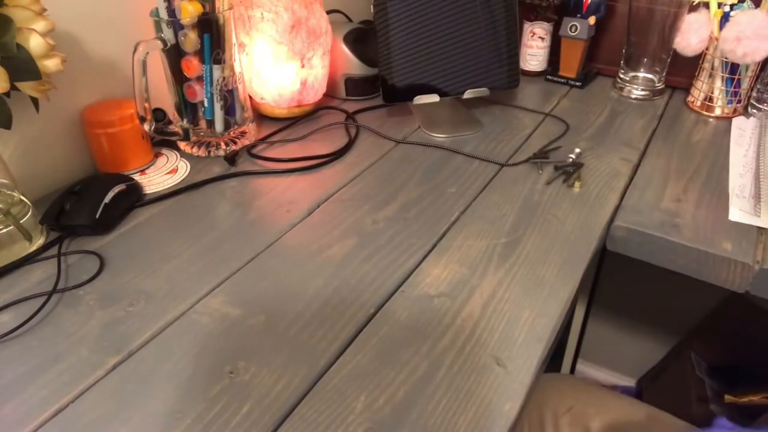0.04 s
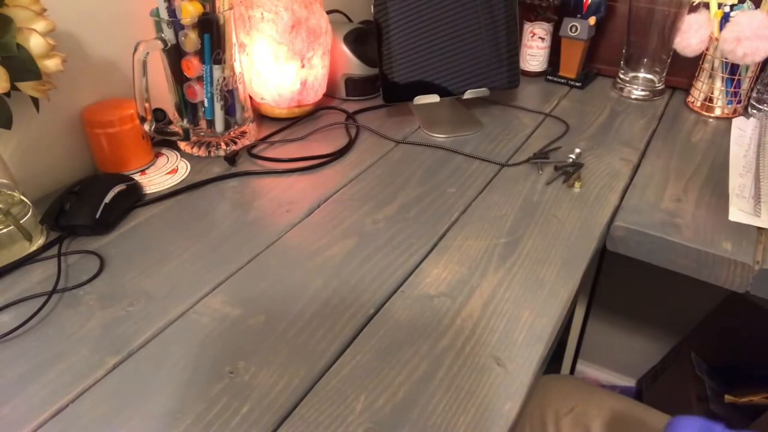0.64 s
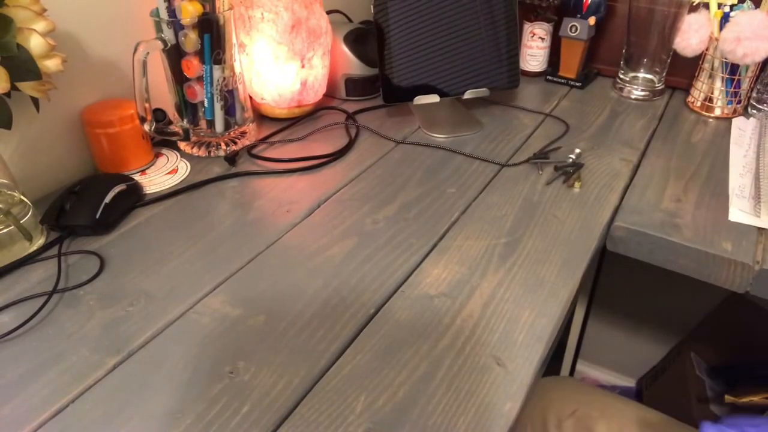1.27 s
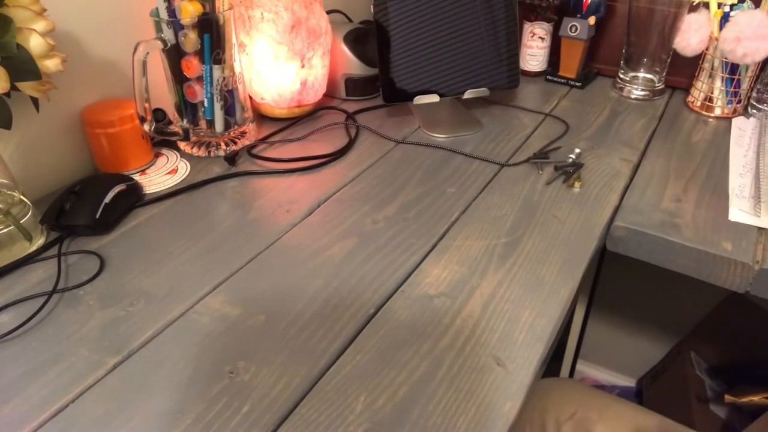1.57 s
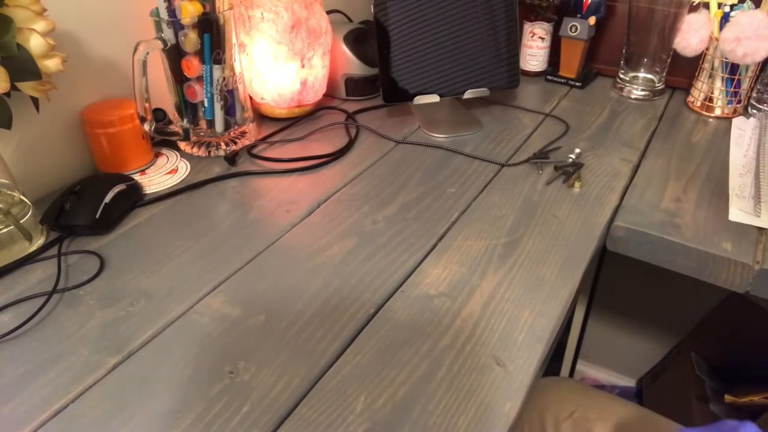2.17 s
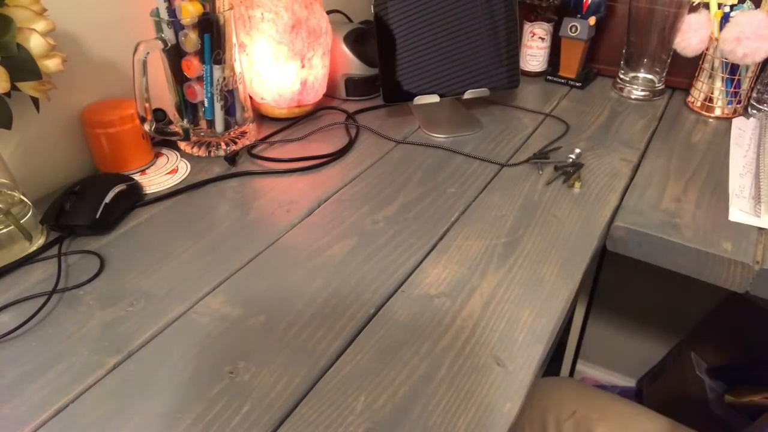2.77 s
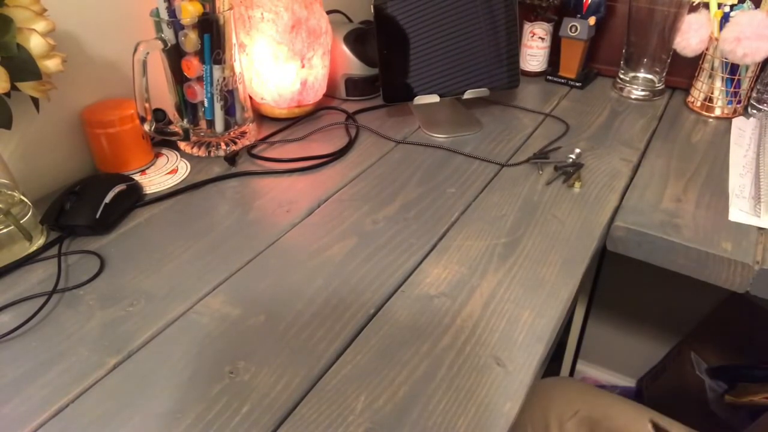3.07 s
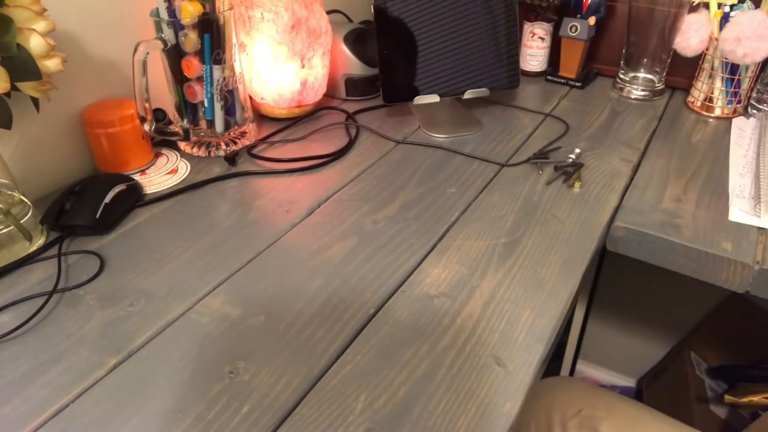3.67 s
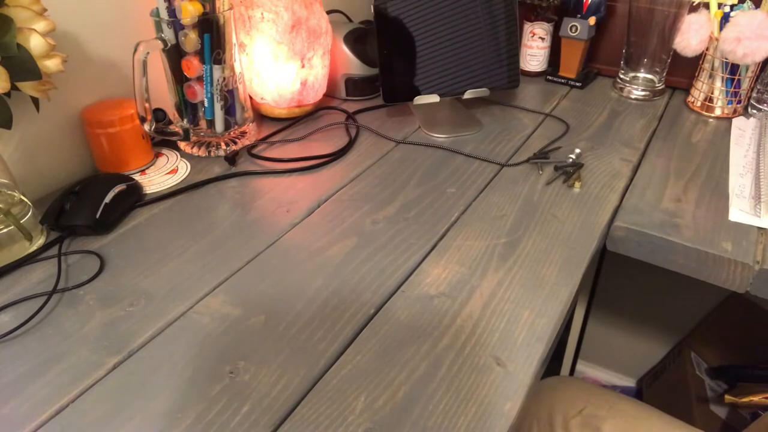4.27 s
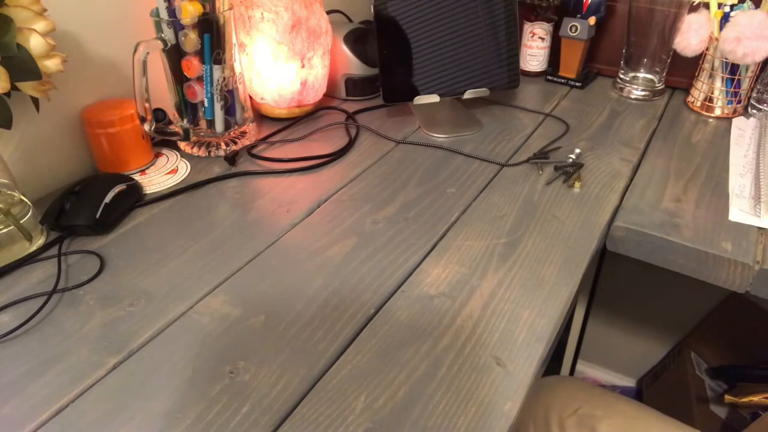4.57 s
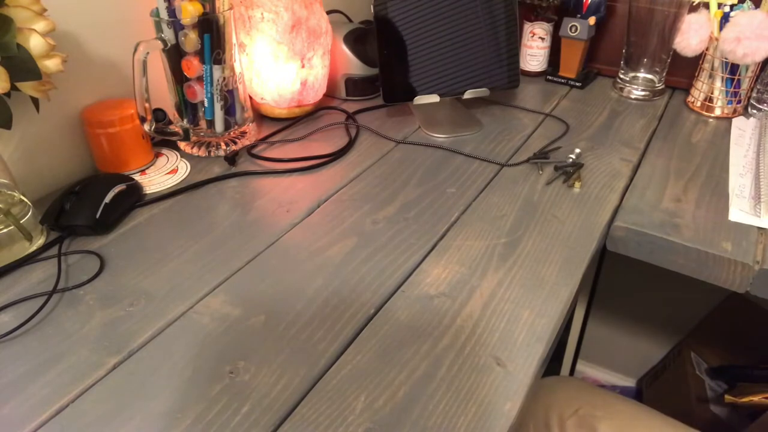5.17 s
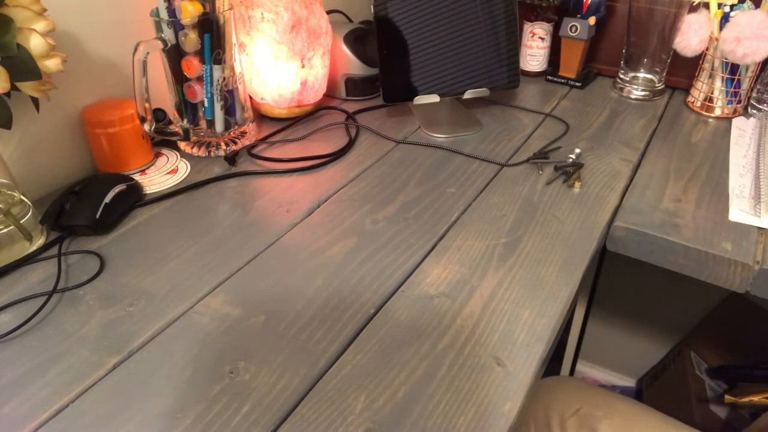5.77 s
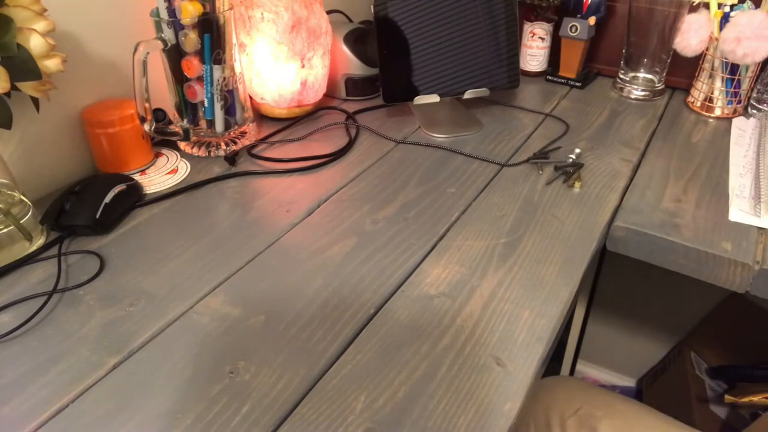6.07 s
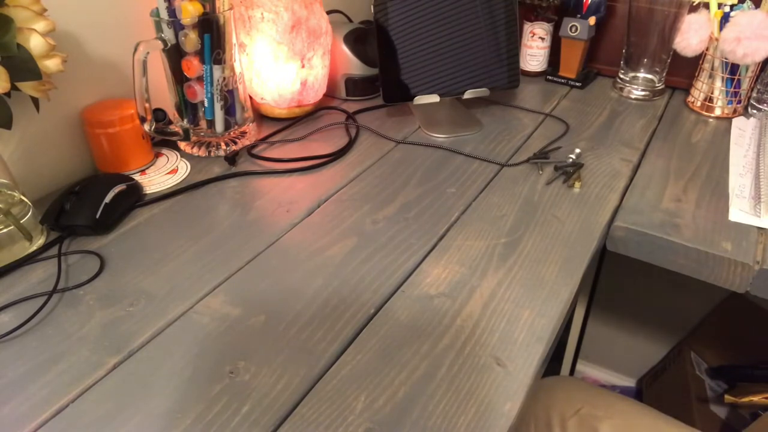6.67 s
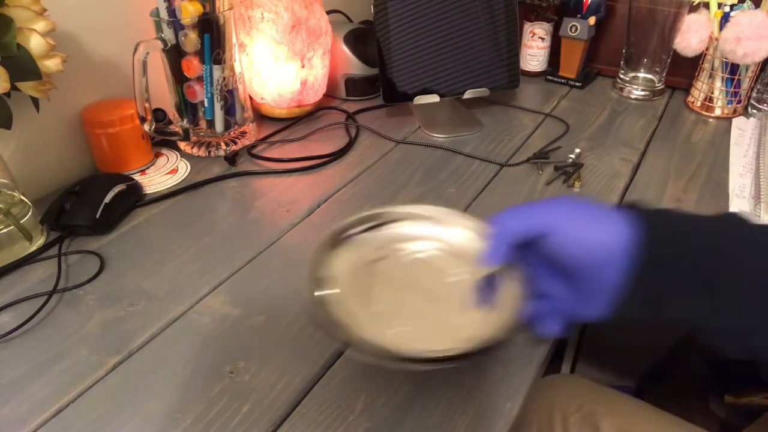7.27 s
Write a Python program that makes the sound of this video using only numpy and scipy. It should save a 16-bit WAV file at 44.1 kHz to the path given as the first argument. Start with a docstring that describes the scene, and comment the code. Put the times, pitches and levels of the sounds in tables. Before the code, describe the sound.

Hard plastic packaging creaks, rustles and pops as it is worked open by hand near the microphone. The handling builds to a run of sharp cracks and crackles, then eases into softer pops and ticks. A metal dish inside then slides out with a short scrape and a damped clank, the loudest moment. The room is small, with little echo, soft air noise and a low hum.

```python
"""Beside a desk in a small room, gloved hands pry open a stiff, clear plastic blister pack.
The shell buckles: small panels jump with sharp snaps, broad ones with hollow pops, and each pulse
spreads through the sheet as bending waves. Between them, stick-slip friction makes the plastic rub
and crinkle. The metal dish inside scrapes out of its hollow, knocks against the shell and rings
faintly as it comes free. Quiet room air and a low hum lie underneath."""
import sys
import numpy as np
from scipy import signal
from scipy.fft import rfft, irfft
from scipy.io import wavfile
from scipy.ndimage import map_coordinates

SR = 44100
rng = np.random.default_rng(int(sys.argv[2]) if len(sys.argv) > 2 else 0)


def master_out(mix):
    """Clip the mix to full scale and print it as 16-bit PCM to the path in sys.argv[1]."""
    frames = np.transpose(np.atleast_2d(mix))
    ceiling = np.clip(frames, -1, 1)
    pcm = np.round(ceiling * 32767).astype(np.int16)
    wavfile.write(sys.argv[1], SR, pcm)


N = 323253
TIME = np.arange(N) / SR
SIZE = 16384  # samples in an impulse response
HZ = np.maximum(np.fft.rfftfreq(SIZE, 1 / SR), 1)
AGE = np.arange(SIZE) / SR
FADE_OUT = np.clip((AGE[-1] - AGE) * 10, 0, 1)  # closes a response over its last 0.1 s
RING_Q = 5.25  # quality factor of the panels and of the dish's hand-damped rim


def undb(db):
    """Decibels to amplitude ratio."""
    return 10 ** (np.asarray(db) / 20)


def curve(points, hz):
    """Linear interpolation on a log-frequency axis."""
    f, value = np.transpose(points)
    return np.interp(np.log(hz), np.log(f), value)


def unit(x):
    """Normalisation to rms 1."""
    return x / np.sqrt(np.mean(x ** 2))


def add(out, start_s, x):
    """Superposition: x joins out from start_s on."""
    i = max(int(start_s * SR), 0)
    out[i:i + len(x)] += x[:N - i]


def through(x, response):
    """Convolution, cut to the length of x."""
    return signal.fftconvolve(x, response)[:len(x)]


def minimum_phase(gain):
    """Minimum phase gives the most compact causal pulse with this gain over HZ."""
    cepstrum = irfft(np.log(gain + 1e-6))
    cepstrum[1:SIZE // 2] *= 2
    cepstrum[SIZE // 2 + 1:] = 0
    return irfft(np.exp(rfft(cepstrum)))


def whiten(response, share=0.45):
    """Spectral whitening: unit power in broad bands, with the finer resonances kept."""
    cumulative = np.cumsum(np.abs(rfft(response)) ** 2)
    low = np.maximum(HZ * (1 - share) - 50, 1)
    high = np.minimum(HZ * (1 + share) + 50, SR / 2)
    in_band = np.interp(high, HZ, cumulative) - np.interp(low, HZ, cumulative)
    power = in_band / (high - low) * SR / SIZE
    return through(response, minimum_phase(1 / np.sqrt(power)))


def resonance(hz, width):
    """Gain of a damped resonator, 1 at its centre."""
    return 1 / np.sqrt(1 + (hz / width * (HZ / hz - hz / HZ)) ** 2)


def reflections(t60):
    """Dense reflections merge into exponentially decaying noise of unit energy."""
    return unit(rng.standard_normal(SIZE) * undb(-60 * AGE / t60)) / np.sqrt(SIZE)


def waver(hz):
    """Random modulation: low-passed noise of rms 1."""
    return unit(irfft(rfft(rng.standard_normal(SIZE)) / (1 + (HZ / hz) ** 2)))


def background(air_db=-65.5):
    """Noise floor: room air as steady coloured noise, with a low pure-tone hum."""
    # Each row: frequency in Hz, relative level in dB.
    air_spectrum = [(25, -15), (55, 9.5), (85, -1), (650, -6), (5000, -19.5), (10400, -25.5),
                    (15500, -27.5)]
    # Each row: frequency in Hz, rms level in dB.
    hum_tones = [(120, -73)]
    air = unit(through(rng.standard_normal(N), minimum_phase(undb(curve(air_spectrum, HZ)))))
    hum = sum(np.sqrt(2) * undb(db) * np.sin(2 * np.pi * hz * TIME) for hz, db in hum_tones)
    return undb(air_db) * air + hum


def room(wet_db, gap_s=0.0016, absorb_hz=9000, wall_s=0.01, wall_spread_s=0.0012, wall_db=-9):
    """Reverberation: direct sound, then a tail dulled by absorption, new for each position of the pack."""
    # Each row: frequency in Hz, time to decay by 60 dB in seconds.
    decay_times = [(500, 0.26), (12000, 0.32)]
    band_hz, band_t60 = np.transpose(decay_times)
    shares = [curve(list(zip(band_hz, row)), HZ) for row in np.eye(len(band_hz))]
    spectrum = sum(np.sqrt(share) * rfft(reflections(t60)) for share, t60 in zip(shares, band_t60))
    tail = irfft(spectrum / np.hypot(1, (HZ / absorb_hz) ** 2))
    near_walls = 1 + undb(wall_db) * np.exp(-((AGE - wall_s) / wall_spread_s) ** 2)
    onset = np.clip(AGE / gap_s - 1, 0, 1)
    response = undb(wet_db) * tail * near_walls * onset * FADE_OUT
    response[0] += 1
    return response


def blister(depth):
    """Cavity resonance: the hollow shell lifts the frequencies near its modes."""
    # Each row: frequency in Hz, bandwidth in Hz, relative level in dB.
    modes = [(503, 5.3, -10.5), (534, 23, -4), (632, 22, 5.5), (813, 7.3, 9)]
    return 1 + depth * sum(undb(db) * resonance(hz, width) ** 2 for hz, width, db in modes)


def slips(per_s, scatter_db, smooth_db):
    """Stick-slip friction: random impulses of very uneven size over a smooth sliding hiss."""
    size = undb(scatter_db * np.minimum(rng.exponential(size=N), 4))
    grains = (rng.random(N) < per_s / SR) * size * rng.choice([-1, 1], N)
    return unit(unit(grains) + undb(smooth_db) * rng.standard_normal(N))


def stroke(peak_s, swell_s, fade_s, drop_db=21.5, roundness=1.444):
    """Envelope of sliding speed: 1 at the peak, drop_db lower swell_s before and fade_s after."""
    away = np.maximum((peak_s - TIME) / swell_s, (TIME - peak_s) / fade_s)
    return undb(-drop_db * np.minimum(away, 10) ** roundness)


def radiate(force, gain):
    """Source and filter: friction sounds through the plastic and the room, a response of unit energy."""
    response = through(minimum_phase(gain), whiten(room(wet_db=-5.5)))
    return through(force, unit(response) / np.sqrt(SIZE))


def rubbing(grip_fizz_db=-11, body_db=-2):
    """Friction on plastic and glove rasps, hisses, drums on the shell and fizzes at its finest creases."""
    # The gloves never rest. Each row: time in seconds, rustle level in dB.
    grip_levels = [(0, -67.5), (2.3, -75.5), (4.9, -62), (5.3, -82), (5.7, -64.5), (7.0, -80)]
    # Each row: peak time, swell and fade in seconds, rasp level in dB, fizz level in dB.
    strokes = [(0.236, 0.094, 0.037, -57.5, -62), (0.57, 0.14, 0.14, -65, -74),
               (0.84, 0.11, 0.091, -51, -62), (1.025, 0.16, 0.069, -56.5, -69),
               (1.165, 0.093, 0.063, -52.5, -57.5), (1.27, 0.24, 0.17, -59, -64),
               (1.515, 0.32, 0.084, -54, -61), (1.785, 0.15, 0.14, -53, -56),
               (2.04, 0.14, 0.11, -54.5, -60.5), (2.141, 0.032, 0.023, -56.5, -55),
               (2.3, 0.07, 0.1, -53, -58), (2.58, 0.16, .09, -63, -62), (2.71, 0.27, 0.33, -59, -69),
               (2.949, 0.085, 0.13, -48.5, -64.5), (3.156, 0.096, 0.1, -45, -83),
               (3.24, 0.084, 0.15, -44, -46.5), (3.631, 0.033, 0.066, -47, -48),
               (3.837, 0.018, 0.15, -44, -48.5), (3.895, 0.078, 0.12, -44, -46.5),
               (4.1, 0.032, 0.056, -56.5, -56.5), (4.332, 0.064, 0.043, -43, -45),
               (4.47, 0.13, 0.092, -50.5, -49.5), (4.7, 0.14, 0.05, -56.5, -55),
               (4.984, 0.077, 0.055, -49.5, -85), (5.087, 0.021, 0.027, -50, -60.5),
               (5.93, 0.15, 0.16, -52, -59), (6.02, 0.036, 0.076, -48.5, -65), (6.38, 0.23, 0.2, -55, -65),
               (6.575, 0.094, 0.12, -43.5, -52), (6.6, 0.055, 0.043, -38, -45.5),
               (6.67, .025, 0.074, -49.5, -59), (7.27, 0.071, 0.027, -60, -94)]
    # Four friction spectra. Each row: frequency in Hz, relative level in dB.
    rasp_spectrum = [(600, -46), (1400, 13.5), (2400, 7.5), (4500, 4.5), (9000, -24)]
    hiss_spectrum = [(2400, -9.5), (4200, -0.5), (6500, 4), (9500, -22)]
    body_spectrum = [(70, -16), (135, -3), (190, -3.5), (450, 2.5), (1100, 0.5), (2200, -22)]
    fizz_spectrum = [(5000, -26), (8000, 12), (10500, 9.5), (13500, 11.5), (16000, 6.5)]
    grip = undb(np.interp(TIME, *np.transpose(grip_levels)))
    rasp, fizz = grip, grip * undb(grip_fizz_db)
    for peak_s, swell_s, fade_s, rasp_db, fizz_db in strokes:
        speed = stroke(peak_s, swell_s, fade_s)
        rasp = np.hypot(rasp, undb(rasp_db) * speed)
        fizz = np.hypot(fizz, undb(fizz_db) * speed)
    fine = slips(per_s=1300, scatter_db=4.5, smooth_db=0.5)
    coarse = slips(per_s=450, scatter_db=4.0, smooth_db=-2.5)
    bright = fizz / (fizz + rasp)  # the finer the creases, the more of the rasp turns to hiss
    return (radiate(fine * rasp * np.sqrt(1 - bright), undb(curve(rasp_spectrum, HZ)) * blister(0.13))
            + radiate(fine * rasp * np.sqrt(bright), undb(curve(hiss_spectrum, HZ)))
            + radiate(coarse * rasp * undb(body_db), undb(curve(body_spectrum, HZ)) * blister(0.3))
            + radiate(fine * fizz, undb(curve(fizz_spectrum, HZ))))


def dish_scrapes(hollow_width_hz=29, hollow_db=6, rise_per_s=0.23):
    """Forced vibration: slips drive the dish and the air behind it, and the pitch climbs as it slides."""
    # Each row: peak time, swell and fade in seconds, level in dB, the hollow's pitch at the peak in Hz.
    scrapes = [(5.951, 0.022, 0.09, -44, 586), (6.319, 0.18, 0.47, -51.5, 710),
               (6.562, 0.05, 0.046, -34.5, 683)]
    # Each row: frequency and bandwidth at a scrape's peak in Hz, relative level in dB.
    resonances = [(1550, 210, 1), (1980, 140, 2.5), (2420, 160, -0.5), (2640, 160, -2)]
    out = np.zeros(N)
    metal = np.sqrt(sum((undb(db) * resonance(hz, width)) ** 2 for hz, width, db in resonances))
    for peak_s, swell_s, fade_s, db, hollow_hz in scrapes:
        gain = np.hypot(metal, undb(hollow_db) * resonance(hollow_hz, hollow_width_hz))
        steady = unit(through(slips(per_s=800, scatter_db=3.0, smooth_db=-3.0), minimum_phase(gain)))
        warped_s = TIME + rise_per_s * (TIME - peak_s) ** 2 / 2
        climbing = map_coordinates(steady, [warped_s * SR], mode="mirror")
        out += undb(db) * stroke(peak_s, swell_s, fade_s) * climbing
    return radiate(out, np.ones(len(HZ)))


def jump_spectrum(low_hz, edge_hz, treble_db):
    """Radiation from a small panel: little bass, an upper edge set by its speed, a treble shelf above."""
    radiation = (HZ / low_hz) ** 2 / np.sqrt(1 + (HZ / low_hz) ** 4)
    return radiation * np.sqrt(1 / (1 + (HZ / edge_hz) ** 8) + undb(treble_db) ** 2)


def sheet(gain, delay_s, rattle_db, rattle_t60, wet_db):
    """Dispersion: bending waves cross the sheet treble first, rebound from its edges and fill the room."""
    bending = np.exp(-4j * np.pi * delay_s * np.sqrt(1000 * HZ))  # delay_s is the group delay at 1 kHz
    pulse = irfft(rfft(minimum_phase(gain)) * bending) * FADE_OUT
    rebounds = undb(rattle_db) * reflections(rattle_t60)
    gathered_db = 10 * np.log10(1 + undb(rattle_db) ** 2)  # pulse and rebounds both feed the room
    return through(pulse, whiten(rebounds + room(wet_db + gathered_db)))


def dish_knocks(rim_hz=1580, waver_depth=0.95):
    """Free vibration after impact: the rim clanks, then the metal's modes waver in the loose grip."""
    # Each row: start in seconds, clank level in dB, upper edge in Hz, ring level in dB.
    knocks = [(5.362, -28, 7740, -70), (5.944, -19, 3000, -55.5), (6.751, 14.5, 2130, -47),
              (6.7681, 9, 3220, -64.5)]
    # Each row: frequency in Hz, relative level in dB, time to decay by 60 dB in seconds.
    modes = [(4360, 3, 0.12), (4500, 9.5, 0.1), (6350, 5, 0.12), (7290, -5, 0.36), (7440, -7, 0.35)]
    out = np.zeros(N)
    rim = 1 + resonance(rim_hz, rim_hz / RING_Q) ** 2
    for start_s, clank_db, edge_hz, ring_db in knocks:
        gain = jump_spectrum(low_hz=602, edge_hz=edge_hz, treble_db=-23) * rim
        clank = sheet(gain, delay_s=0.00077, rattle_db=10, rattle_t60=0.02, wet_db=-4.0)
        add(out, start_s, undb(clank_db) * clank)
        for hz, db, t60 in modes:
            ring = undb(ring_db + db - 60 * AGE / t60) * np.sin(2 * np.pi * hz * AGE)
            ring *= 1 + waver_depth * waver(hz=71)
            add(out, start_s, through(ring, room(wet_db=-5)) * FADE_OUT)
    return out


def crease_ticks():
    """Local buckling: single creases flick over with tiny bright ticks."""
    # Each row: start in seconds, level in dB, treble shelf in dB.
    flicks = [(0.2353, -12, -11), (0.51, -22.5, -36), (0.789, -26, 1.5), (0.987, -15.5, -22),
              (1.093, -20.5, -7), (1.325, -19, -5.5), (1.64, -30, -2), (2.504, -16, -17),
              (2.7149, -13, -16), (3.2662, -0.5, -40), (5.495, -22, -19), (5.636, -6, -16),
              (5.869, -13, -25), (5.9845, -11, -9), (6.668, -6.5, -8), (7.107, -24.5, -14)]
    out = np.zeros(N)
    for start_s, db, treble_db in flicks:
        gain = jump_spectrum(low_hz=850, edge_hz=4180, treble_db=treble_db)
        tick = sheet(gain, delay_s=0.00075, rattle_db=-1, rattle_t60=0.057, wet_db=-1.0)
        add(out, start_s, undb(db) * tick)
    return out


def panel_pops():
    """Panel-cavity coupling: broad panels pop or are bumped and sound the hollow; some shudder."""
    # Each row: start in seconds, level in dB, low corner and upper edge in Hz, relative shudder in dB.
    pops = [(0.675, 5.5, 400, 535, -21), (1.003, 5.5, 223, 550, 31), (1.577, 1, 266, 347, -1),
            (1.658, 20, 524, 560, -32), (2.033, -3, 440, 536, -23), (2.307, 5, 265, 513, 22),
            (2.508, -4, 245, 790, -0.5), (2.938, -6, 390, 3070, 23), (2.986, 6, 322, 393, -8),
            (3.621, 9, 288, 890, 32), (3.9175, 29.5, 555, 654, 4), (4.82, -6, 240, 1700, 13),
            (4.851, 1, 120, 229, -18), (5.362, -2, 700, 790, 4), (5.494, -1, 343, 960, 9.5),
            (5.631, 13.5, 218, 694, 1.5), (5.848, 0, 218, 700, 16), (5.944, 4.5, 202, 1090, 5),
            (6.013, -5, 346, 2360, 5)]
    out = np.zeros(N)
    for start_s, db, low_hz, edge_hz, shudder_db in pops:
        gain = jump_spectrum(low_hz, edge_hz, treble_db=-60) * blister(depth=0.67)
        pop = sheet(gain, delay_s=0.00043, rattle_db=shudder_db, rattle_t60=0.1, wet_db=-4.5)
        add(out, start_s, undb(db) * pop)
    return out


def shell_snaps():
    """Snap-through buckling: each crack, clean or chattering, rings the panel that gave way."""
    # Each row: start in seconds, level in dB, low corner and upper edge in Hz, treble shelf in dB,
    # relative chatter in dB, and the panel's modes as pairs of frequency in Hz and strength in dB.
    snaps = [(0.7368, 4, 263, 2550, -52, 2, [(328, 11.5), (1620, 5), (2700, 8)]),
             (1.398, 0, 330, 2940, -26, 1, []), (2.3212, 5.5, 606, 1810, -39, -21, [(330, 17.5)]),
             (2.9267, -3, 515, 4500, -13.5, 14, [(563, 13)]), (3.1607, 9, 503, 2600, -35, 4, []),
             (3.1633, 11.5, 161, 5760, -44, 0, [(2200, 8.5)]), (3.1811, 14.5, 383, 3870, -23, -9, []),
             (3.3599, 15, 605, 7000, -9.5, -1, [(760, -7)]), (3.4316, 10, 470, 6300, -25.5, 1, [(3200, 1.5),
             (6000, 8)]), (3.9106, 7.5, 480, 4970, -38, -1, [(900, 7)]), (3.921, 12, 420, 2980, -47, 6, []),
             (4.2052, 1, 1550, 3330, -1, 5, [(2600, 4)]), (4.2134, 0.5, 885, 3800, -5, 0, []),
             (4.2261, -0.5, 516, 3800, -4, -2, [(1400, 5.5)]), (4.2379, 0.5, 900, 4200, -13, 7, []),
             (4.514, 7.5, 193, 4520, -11, 4, []), (4.5647, 10, 830, 3800, -51, -8, [(6300, 9.5)])]
    out = np.zeros(N)
    for start_s, db, low_hz, edge_hz, treble_db, chatter_db, modes in snaps:
        panel = 1 + sum(undb(mode_db) * resonance(hz, hz / RING_Q) ** 2 for hz, mode_db in modes)
        gain = jump_spectrum(low_hz, edge_hz, treble_db) * panel * blister(depth=0.15)
        crack = sheet(gain, delay_s=0.0006, rattle_db=chatter_db, rattle_t60=0.017, wet_db=-1.5)
        add(out, start_s, undb(db) * crack)
    return out


def scene():
    """Superposition: plastic, dish and room air sum in one channel."""
    plastic = shell_snaps() + panel_pops() + crease_ticks() + rubbing()
    return (plastic + dish_knocks() + background() + dish_scrapes())[None]


def record(dry, ceiling=0.5, top_hz=15800):
    """Soft saturation rounds the tallest peaks; a steep low-pass cuts the highest treble."""
    rounded = ceiling * np.tanh(dry / ceiling)
    return signal.sosfilt(signal.ellip(10, 0.2, 70, top_hz, fs=SR, output="sos"), rounded)


dry = scene()
out = record(dry)
master_out(out)
```